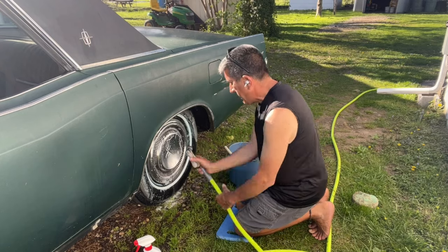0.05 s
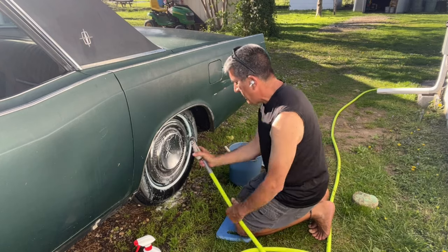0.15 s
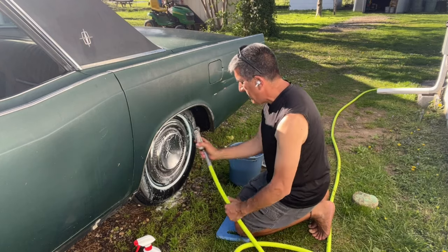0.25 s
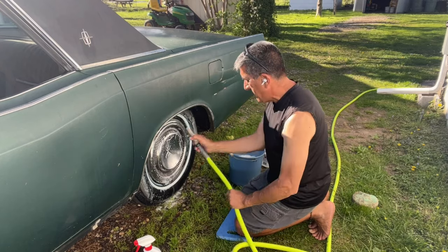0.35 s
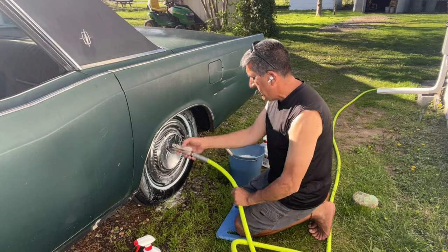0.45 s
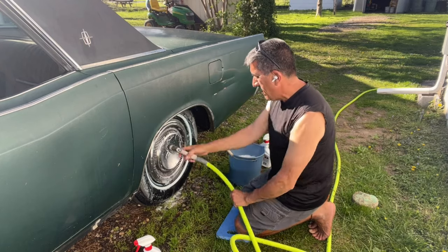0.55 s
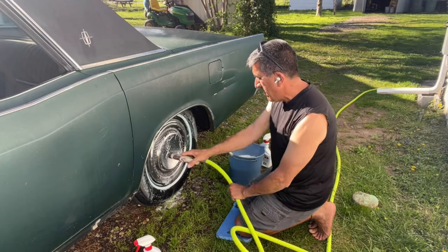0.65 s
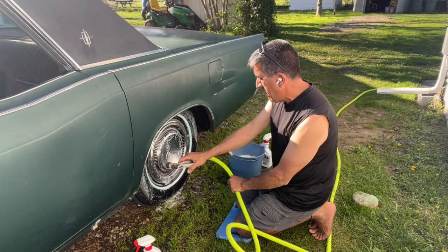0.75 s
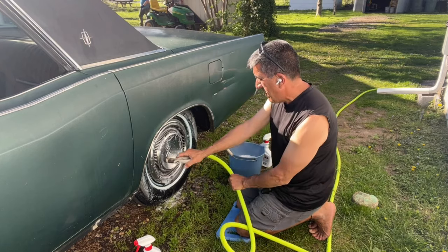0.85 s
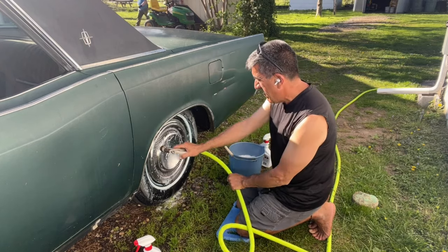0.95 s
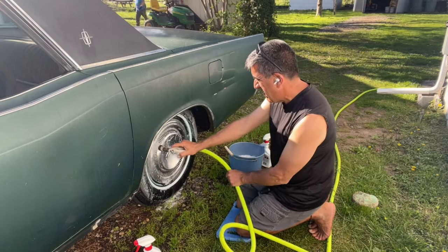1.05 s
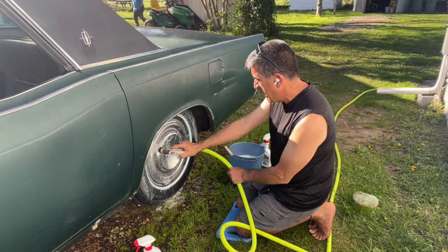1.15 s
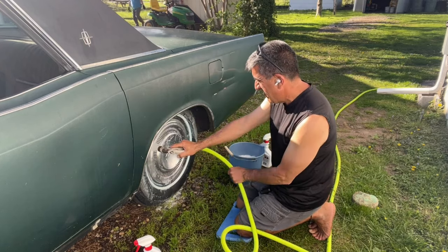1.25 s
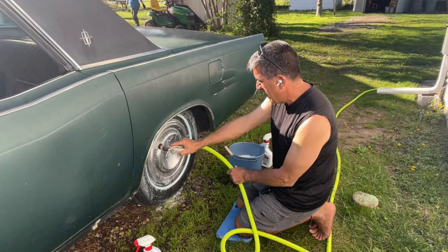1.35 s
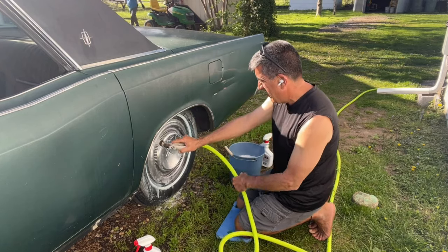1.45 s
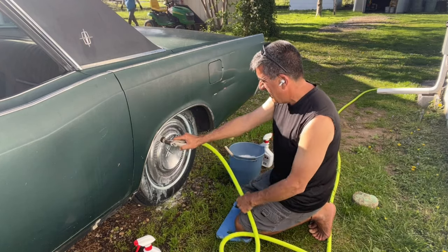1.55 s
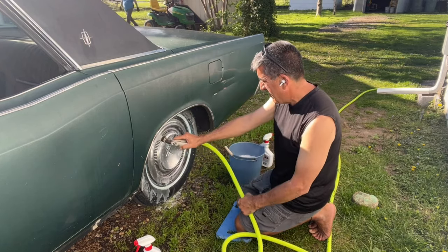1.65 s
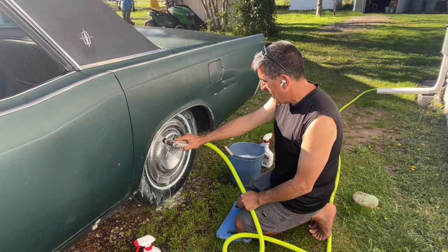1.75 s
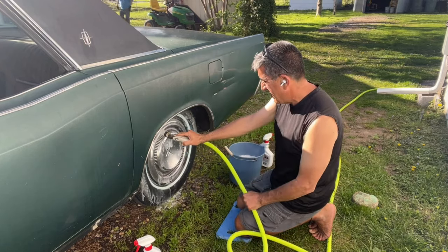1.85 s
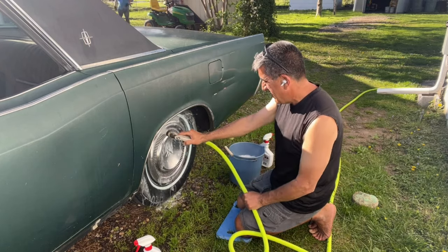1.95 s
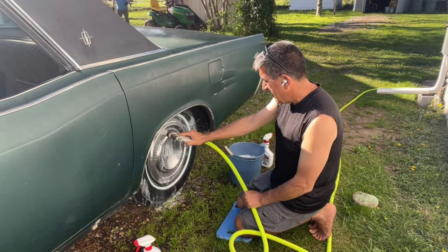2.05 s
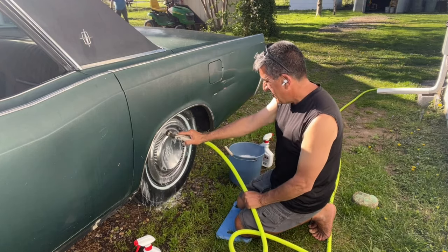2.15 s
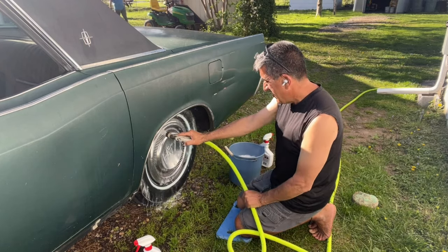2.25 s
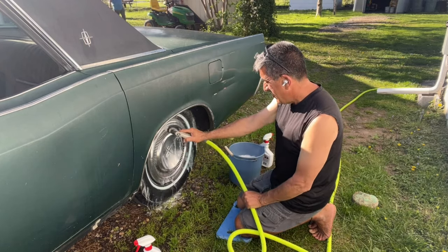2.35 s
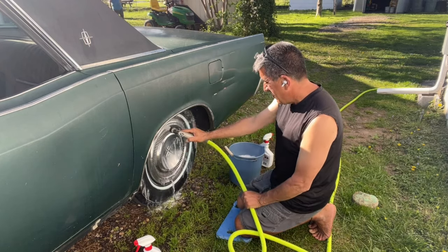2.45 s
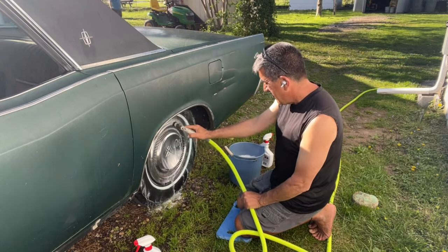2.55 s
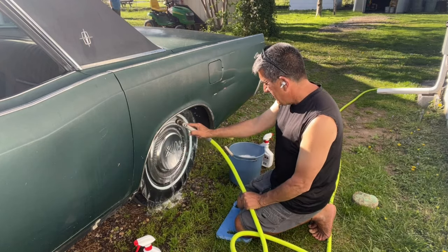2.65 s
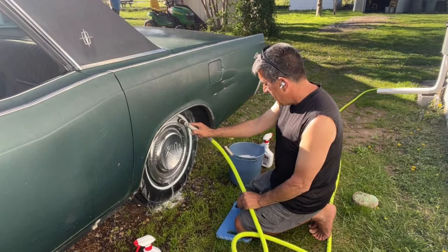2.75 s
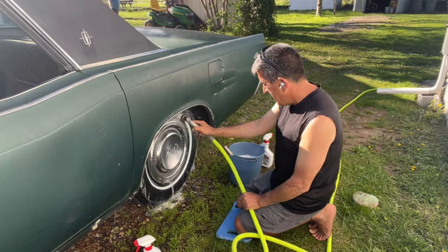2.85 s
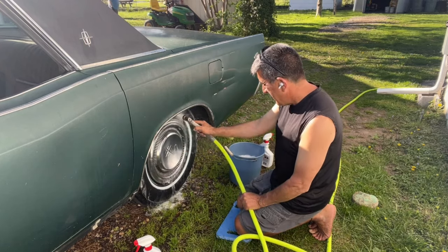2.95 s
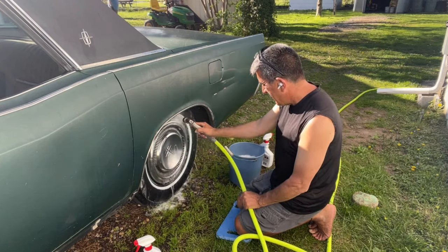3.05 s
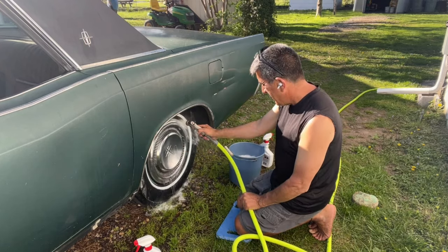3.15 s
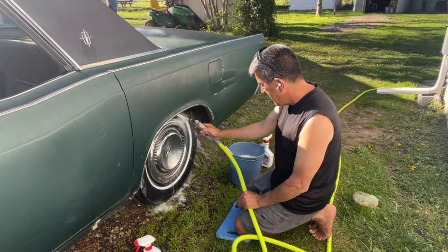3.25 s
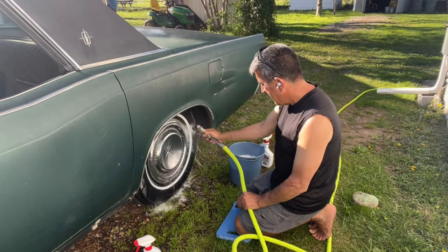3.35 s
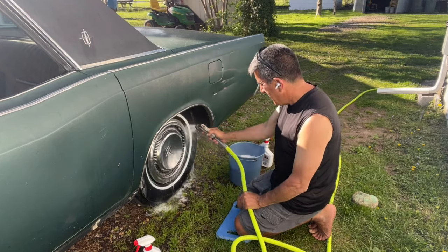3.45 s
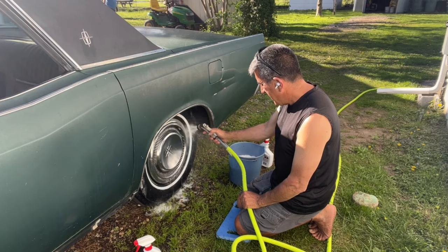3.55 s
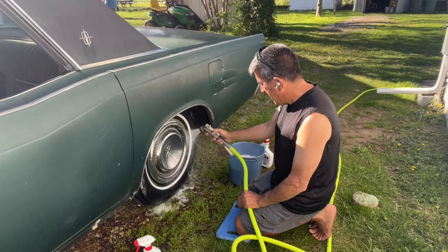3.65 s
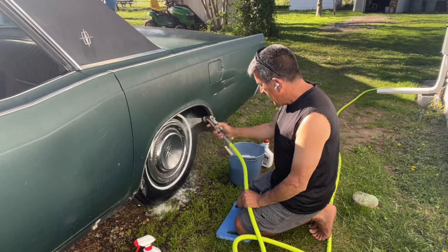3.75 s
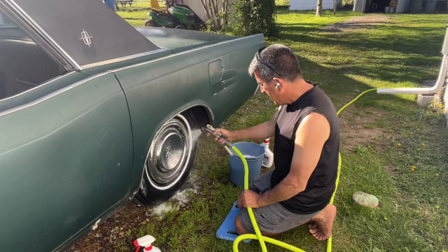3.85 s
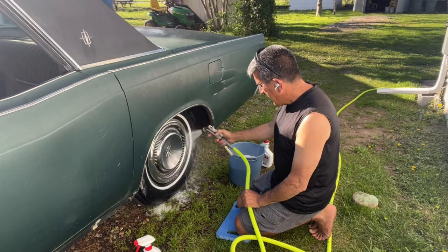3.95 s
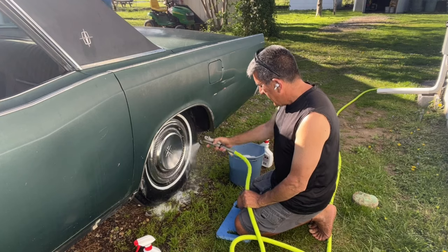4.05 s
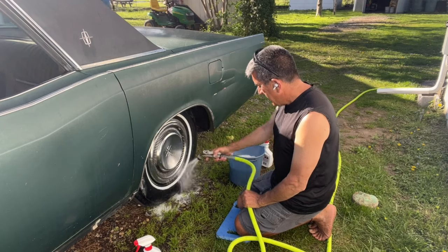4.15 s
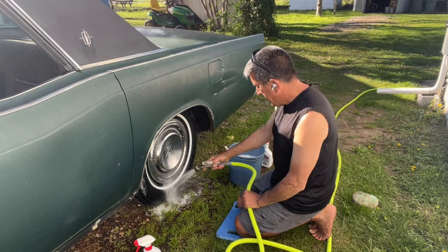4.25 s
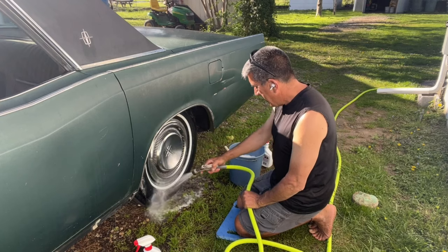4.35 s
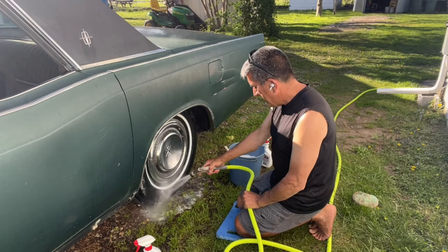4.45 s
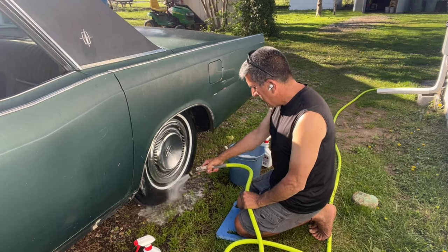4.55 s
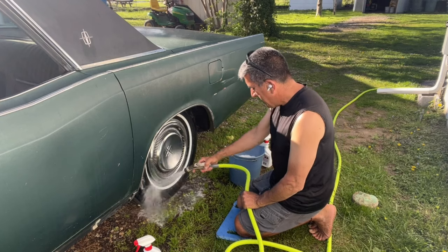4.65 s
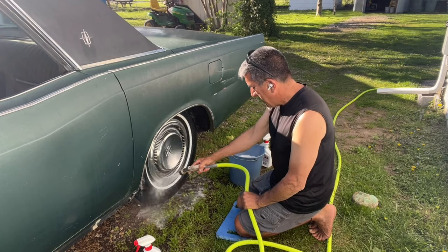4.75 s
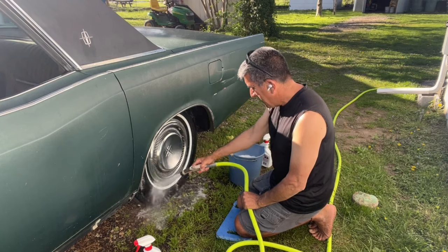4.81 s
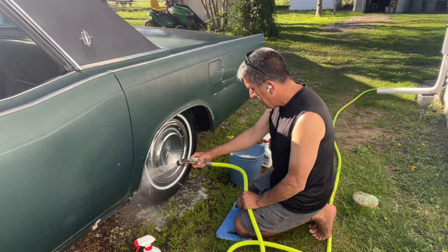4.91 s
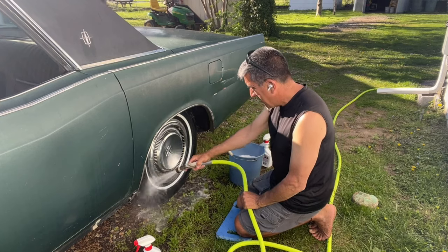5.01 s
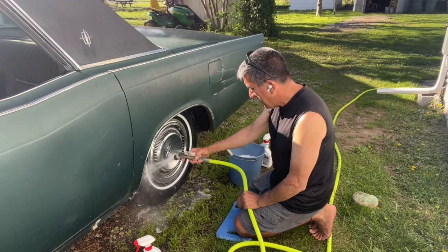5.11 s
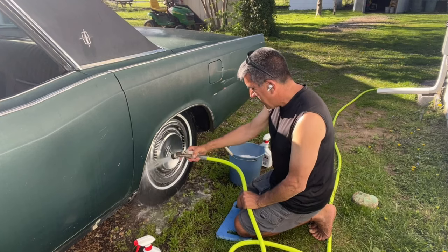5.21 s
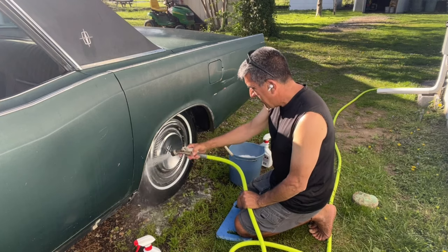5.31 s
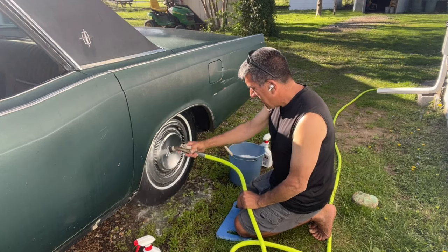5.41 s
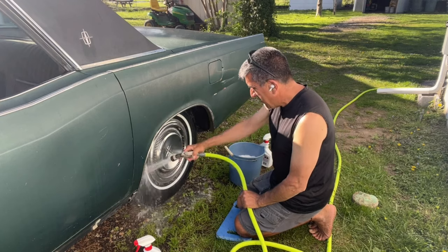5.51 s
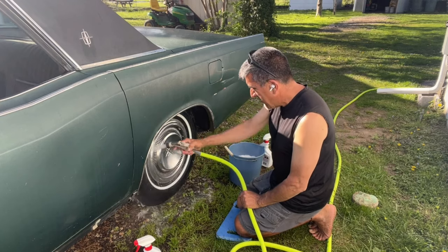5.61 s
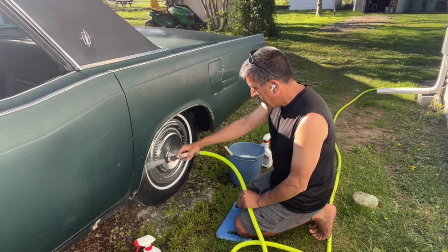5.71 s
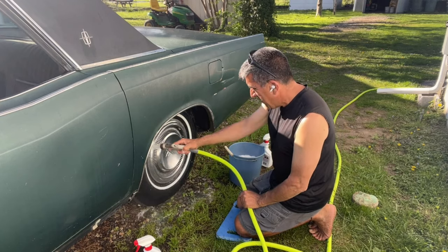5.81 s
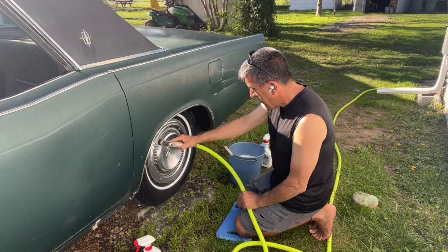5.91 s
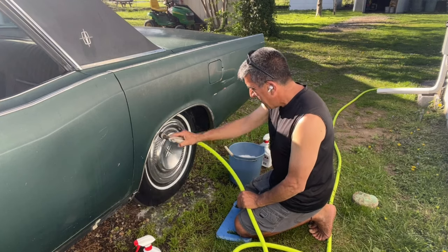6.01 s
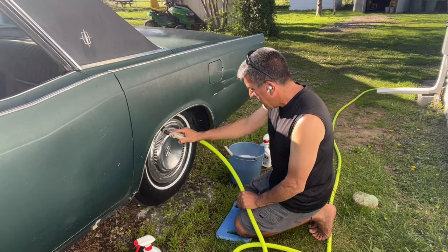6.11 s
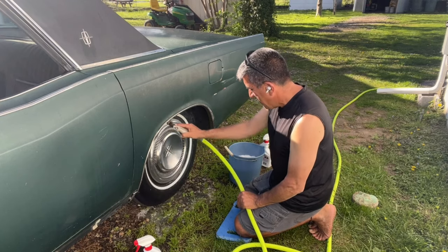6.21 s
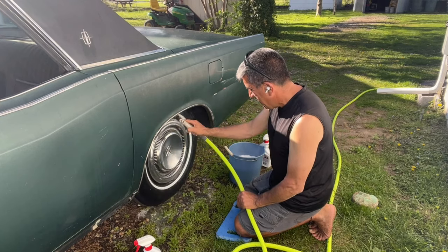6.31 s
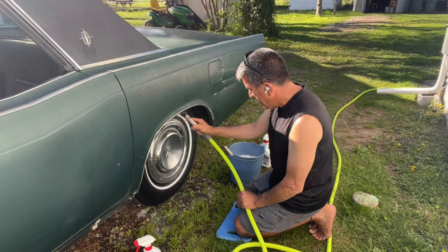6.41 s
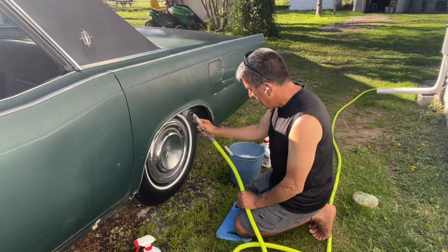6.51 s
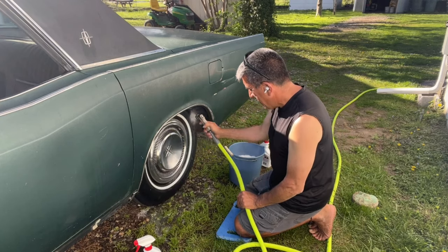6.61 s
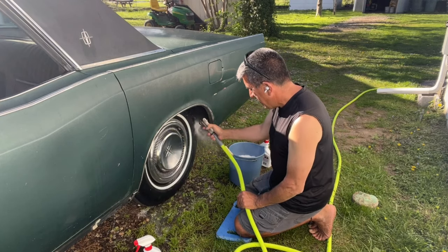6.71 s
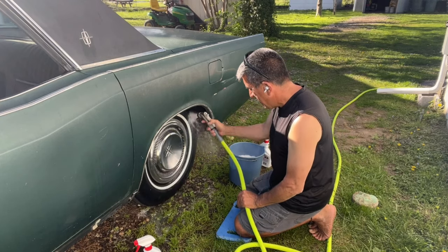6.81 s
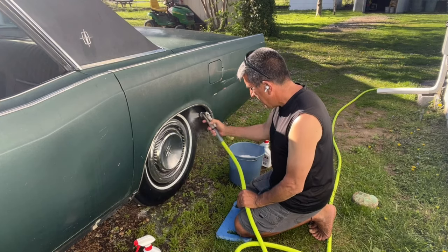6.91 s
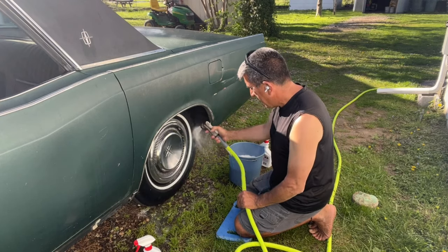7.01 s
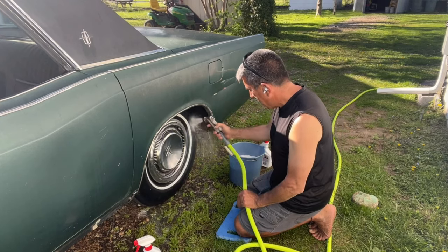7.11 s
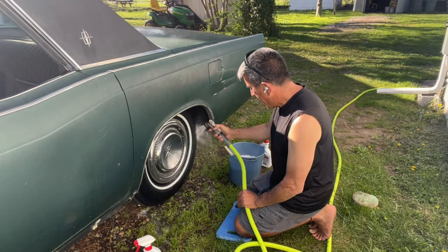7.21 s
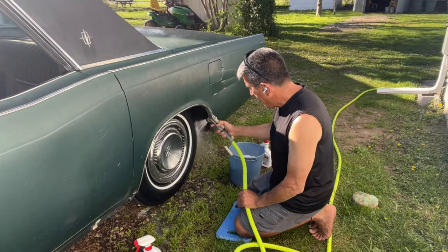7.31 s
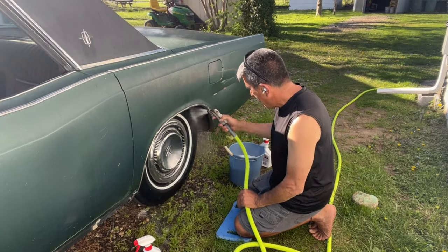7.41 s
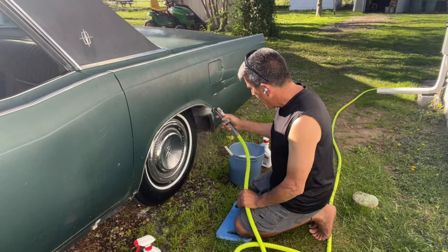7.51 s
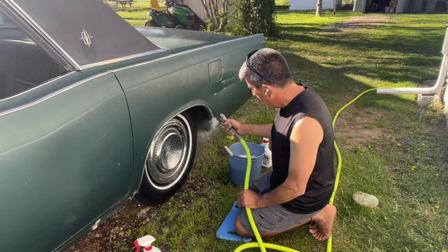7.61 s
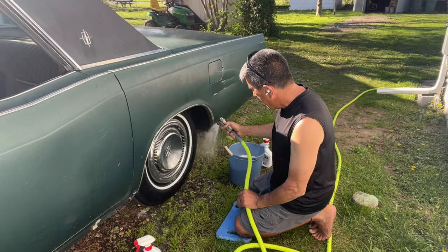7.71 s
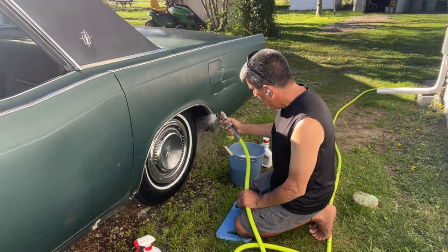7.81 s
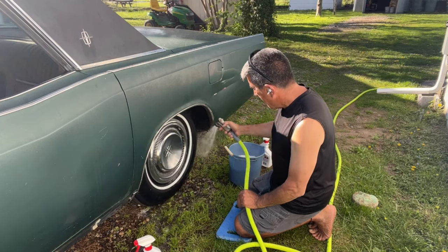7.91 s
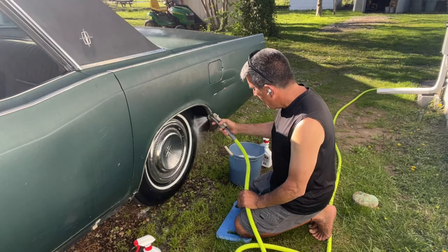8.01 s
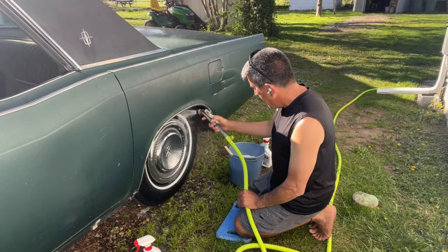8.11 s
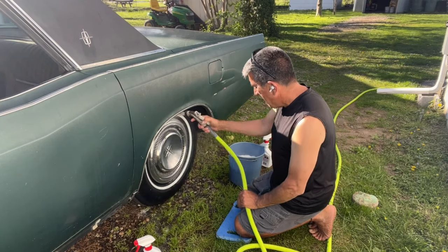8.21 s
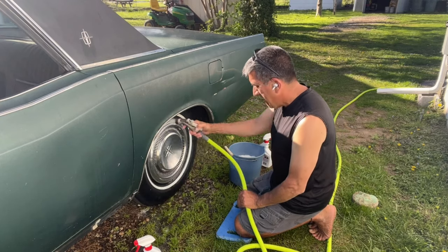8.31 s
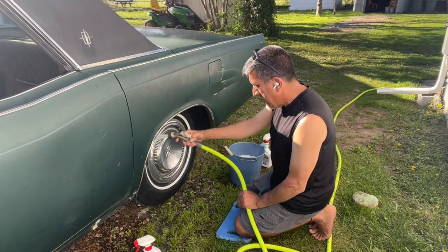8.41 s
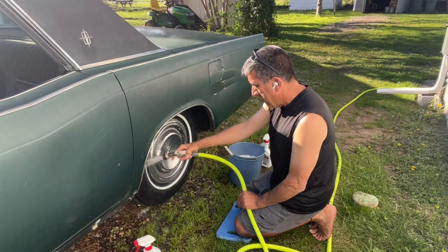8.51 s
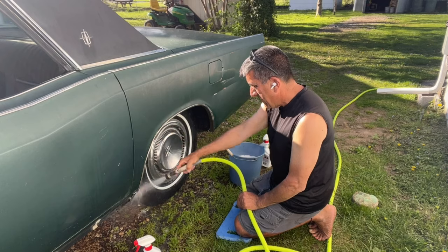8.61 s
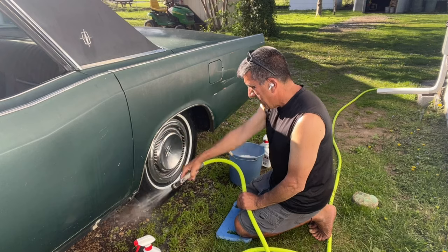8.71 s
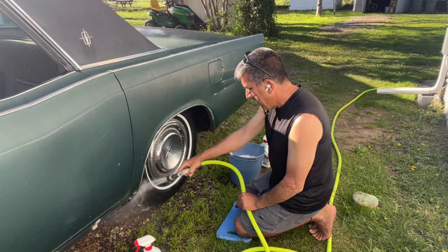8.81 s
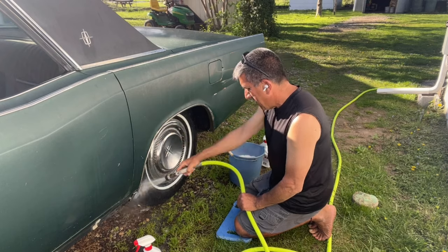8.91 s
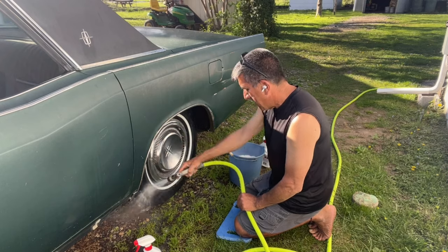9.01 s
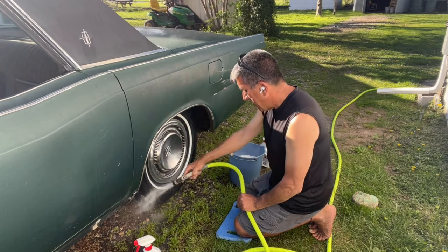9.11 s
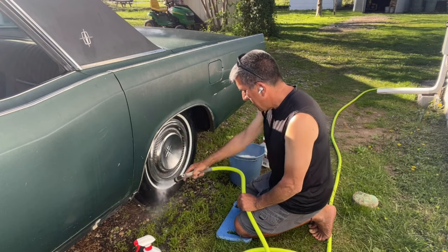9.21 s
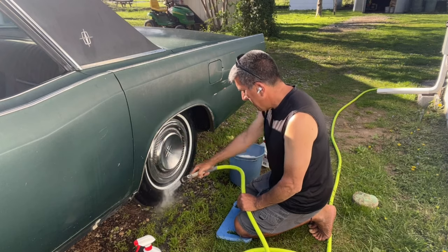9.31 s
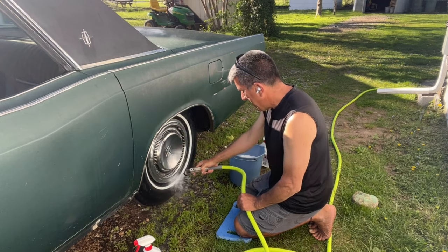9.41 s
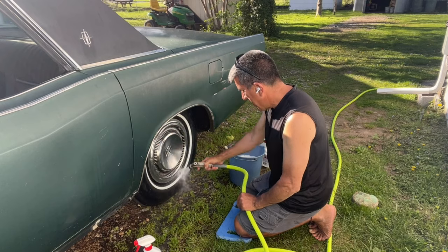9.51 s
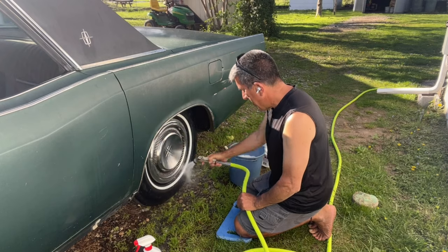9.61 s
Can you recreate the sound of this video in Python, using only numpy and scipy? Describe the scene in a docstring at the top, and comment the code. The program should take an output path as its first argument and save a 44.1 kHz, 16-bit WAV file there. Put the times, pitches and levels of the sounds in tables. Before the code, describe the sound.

After a quiet second outdoors with faint rustles, a hose nozzle opens and sprays hissing water over a car wheel, surging and dipping as it sweeps.

```python
"""Garden hose on a car wheel

A garden hose rinses a car's tire and hubcap on a lawn, heard by one microphone.
The nozzle opens after one second: showers of random drops, filtered into impacts, mist, sizzle, splash and
drumming, surge as the jet sweeps the wheel. Noise through narrow resonances makes hollow notes swell.
Shaped noise makes the rustles, bumps and soft outdoor wash behind; a wind filter soon cuts its bass."""
import sys
import numpy as np
from scipy import signal
from scipy.fft import rfft, irfft
from scipy.io import wavfile

SR = 44100
rng = np.random.default_rng(int(sys.argv[2]) if len(sys.argv) > 2 else 0)


def transcribe(u):
    """Save the signal u as a 16-bit wav file named by the first command-line argument.

    u: samples, shape (n,) or (channels, n), limited to [-1, 1]; the rate is SR.
    q: integer samples, one column per channel.
    """
    v = np.clip(np.atleast_2d(u).T, -1, 1)
    q = np.round(v * 32767).astype(np.int16)
    wavfile.write(sys.argv[1], SR, q)


N = 426006
T, HZ = np.arange(N) / SR, np.fft.rfftfreq(N, 1 / SR)  # time in s, frequency in Hz

# Spectra of the showers, from hard impacts to the ringing hubcap: (frequency [Hz], relative density [dB])
IMPACT_SPECTRUM = [(2500, -36), (3500, -15), (3950, -4.5), (4230, -1.5), (4700, -0.5), (5200, -2),
                   (5700, -12.5), (6450, -8.5), (7300, -19), (12000, -44)]
MIST_SPECTRUM = [(2500, -33.5), (4500, -9.5), (6000, -2), (7200, -1.5), (8600, 0.5), (10100, 0),
                 (10500, -2.5), (10900, -4), (11450, -11.5), (12000, -44.5)]
SIZZLE_SPECTRUM = [(4800, -31), (5700, -2.5), (6400, -1.5), (7000, -6.5), (8500, -30.5)]
SPLASH_SPECTRUM = [(900, -29.5), (1650, -12.5), (1800, -7.5), (2100, -1.5), (2600, 0), (3200, 4),
                   (3650, 4.5), (4400, -7), (6400, -9.5), (9000, -30.5)]
DRUM_SPECTRUM = [(100, -25.5), (400, -9), (620, -1), (850, -2.5), (1050, -2.5), (1350, -8), (2100, -17),
                 (3000, -28.5)]
HUBCAP_SPECTRUM = [(600, -33), (900, 0), (1100, -4), (1450, -0.5), (1750, -1.5), (2100, -9.5), (3000, -29)]
# Resonances and hollows of the wheel and its well: (frequency [Hz], width [Hz], gain [dB])
WHEEL_MODES = [(708, 78, 6), (819, 25, 9), (1146, 26, 8), (1497, 120, 7.5), (1540, 60, -3), (1815, 43, 7.5),
               (1923, 110, 5.5), (2310, 110, 2), (2927, 73, 5.5), (3023, 130, -6), (3117, 65, 4)]
# Slow drift of the spray between passes, before each shower's own trim:
# (time [s], impact level [dB], mist level [dB], splash level [dB])
SPRAY_DRIFT = [(1.1, -42.3, -44.5, -52), (1.57, -44, -45.5, -52), (1.78, -46.5, -46, -55.5),
               (2.3, -47, -44, -58.5), (2.8, -46.5, -46, -56.5), (3.0, -48.5, -48, -60),
               (3.45, -46.5, -48.5, -56.5), (3.98, -49.5, -50.5, -60), (4.5, -47.5, -48, -58.5),
               (5.25, -47.5, -48, -58), (5.75, -48, -46.5, -61), (6.1, -45.5, -47, -62),
               (6.6, -50.5, -52, -64.5), (7.2, -49.5, -49, -63.5), (7.8, -51, -54, -63.5),
               (8.25, -48, -46.5, -56.5), (8.7, -49.5, -50.5, -64), (9.64, -44.5, -45.5, -55)]
# The jet passes squarely over the wheel:
# (time [s], duration [s], surge [dB], extra drumming on hollow metal [dB], extra mist [dB])
WHEEL_PASSES = [(1.141, 0.096, 1, 6.5, 2), (1.953, 0.14, 5, 0.5, 1), (2.057, 0.095, 3, 3, 1),
                (2.472, 0.15, 4.5, 2, 1), (3.133, .08, 6, 0.5, 3), (3.221, 0.092, 7, -0.5, 1),
                (3.333, 0.13, 5.5, -0.5, 1.5), (3.66, 0.085, 3, -4.5, 1), (3.818, 0.073, 3.5, 1, 1.5),
                (4.087, 0.093, 5, 2, 1.5), (4.166, 0.095, 5.5, -1.5, 1), (4.289, 0.13, 7, 1, 2.5),
                (4.394, 0.055, 3.5, -1, 2.5), (4.583, 0.13, 6, -5, 2), (4.76, 0.084, 2.5, -1.5, 2.5),
                (4.837, 0.086, 4.5, 2.5, 2), (4.936, 0.036, 3.5, -2, 1.5), (5.045, 0.11, 5.5, -3, 4.5),
                (5.233, 0.14, 2.9, -0.5, 4.5), (5.473, 0.15, 5.5, -2, 3.5), (5.937, .12, 1.2, 1.5, 0),
                (6.97, 0.11, 2.3, 1, 0.7), (7.91, .06, 1, 3.5, 2.5), (8.282, 0.082, 5, -3, -0.5),
                (8.356, 0.061, 1, 2, 0), (8.938, 0.045, 2.5, -0.5, 2), (9.488, 0.061, 4.5, 5.5, 0.5)]
# The jet slips past the tire into the wheel well and the spray dips: (time [s], duration [s], dip [dB])
WELL_SLIPS = [(6.846, 0.077, -4), (7.112, .07, -4.5), (7.36, 0.083, -6.5), (7.567, 0.072, -4),
              (7.778, 0.086, -6.5), (8.01, 0.24, -5.5), (8.478, .08, -4.5)]
# Where the nozzle points: (time [s], height on the wheel [0 at the ground to 1 at the top of the rim])
NOZZLE_HEIGHT = [(1.0, 0.18), (1.7, 0.74), (2.2, 0.5), (2.8, 0.57), (3.4, 0.99), (4.0, 1), (4.5, 0),
                 (5.2, 0.027), (6.1, 0.94), (7.0, 1), (7.8, 0.64), (8.4, 0.73), (9.1, 0.17), (9.6, 0.23)]
# The jet dwells on a spot and one hollow note swells:
# (time [s], duration at half power [s], frequency [Hz], level [dB])
HOLLOW_NOTES = [(1.133, 0.055, 1870, -53), (1.21, 0.12, 978, -53.5), (1.304, 0.39, 732, -66.5),
                (1.494, .5, 830, -64), (2.073, 0.082, 1120, -60), (2.016, 0.09, 1484, -56.5),
                (3.187, 0.056, 1500, -57), (3.308, 0.11, 1480, -55), (4.165, 0.076, 1480, -58.5),
                (4.43, 0.27, 704, -65.5), (5.8, 0.33, 1906, -65), (9.002, 0.13, 702, -67.5),
                (9.503, 0.12, 1460, -61)]
# The band that the wheel well's echo cancels: (time [s], centre [Hz], depth [0-1])
WELL_HOLLOW = [(1.2, 1180, .92), (1.75, 1047, 0.67), (3.4, 1004, 1), (4.5, 930, .72), (5.3, 898, .3),
               (9.6, 907, 0.3)]
# Soft low bumps and rumbles: (time [s], duration at half power [s], level [dB])
BUMP_EVENTS = [(1.16, .02, -68), (1.635, .025, -67), (2.116, 0.056, -72), (4.02, .02, -74),
               (4.485, .02, -67), (7.228, .018, -60), (7.8, 0.41, -69), (8.35, .2, -77)]
# Their dull tone: (frequency [Hz], relative density [dB])
BUMP_SPECTRUM = [(30, -20), (80, -1), (130, 3), (220, -3), (400, -24)]
# Soft rustles of the hose and clothes as the arm lifts: (time [s], duration at half power [s], level [dB])
RUSTLE_EVENTS = [(0.05, 0.078, -76), (0.107, 0.044, -69), (0.21, 0.086, -64.5), (0.458, .012, -70)]
# Their bright tone: (frequency [Hz], relative density [dB])
RUSTLE_SPECTRUM = [(3000, -19), (5000, -3), (6500, -3), (10000, -1), (11200, -13), (12000, -30)]
# The outdoor wash: (frequency [Hz], relative density [dB])
YARD_SPECTRUM = [(25, -43), (55, -19), (110, -8), (310, -13.5), (560, -4), (720, -5), (1020, -5),
                 (1400, -5), (1900, -1.5), (2200, -2.5), (3200, 1), (4100, -5), (5500, -17.5),
                 (10000, -24.5), (12000, -41)]
# Bumps and hollows in the wash: (frequency [Hz], width [Hz], gain [dB])
YARD_RIPPLE = [(1590, 160, -5.5), (1780, 31, 6.5)]
# Ripple of the microphone port: (frequency [Hz], width [Hz], gain [dB])
PORT_RIPPLE = [(4220, 150, 4), (4610, 87, 3.5), (5405, 110, -9), (5600, 62, 2.5), (5910, 220, -2.5),
               (5870, 90, 3.5), (6050, 77, -2.5), (7300, 54, -4.5), (7660, 190, -2), (7850, 64, 1.5),
               (8100, 110, 1.5), (8800, 230, 0.7), (9550, 180, -1.7), (9950, 230, 2), (10150, 98, -5),
               (10900, 90, 1.5)]
# The wind filter's bass cut: (frequency [Hz], gain [dB])
WIND_FILTER = [(30, -18.5), (100, -25.5), (250, -29.5), (450, -25), (570, -19), (630, -8.5), (680, 0.5)]

OPEN_S, OPEN_TIME = 1, 0.098  # the valve starts to open, and takes this long (s, s)
LAND_S, LAND_TIME = 1.075, 0.02  # the full jet starts to land, and takes this long (s, s)
PASS_EDGE = 3.6  # how squarely a pass starts and ends (2 is a plain bell)
SPLASH_SURGE, DRUM_SURGE, HUBCAP_SURGE = 1.0, .25, .65  # share of a surge; the impacts take all of it
SPLASH_HOLLOW = 0.72  # share of the extra drumming that reaches the splash
IMPACT_SLIP, SPLASH_SLIP, DRUM_SLIP = 0.38, 1, 0.63  # share of a dip; the mist takes all of it
# the low showers follow the splash drift: dB per dB, and offset in dB
DRUM_FOLLOW, DRUM_DB = 0.51, -35
HUBCAP_FOLLOW, HUBCAP_DB = .75, -19
# the hubcap rings less after the first round of the wheel: start (s), fade (s), change (dB)
HUBCAP_DULLS_S, HUBCAP_DULL_TIME, HUBCAP_DULL_DB = 3.7, 0.74, -5
RIM_DB, RIM_RISE_DB = -21, 14.5  # sizzle against the impacts: at the ground, and its gain at the top
NOTE_WIDTH_HZ = 76  # bandwidth of the first of the two resonators that make a note; the second is twice as wide
YARD_DB = -60.5
WIND_CUT_S = 0.82  # middle of the wind filter's switch-in
EDGE_HZ = 11900  # top of the microphone's band


def spray():
    """Showers of drops strike the wheel, follow the sweep and share the sputter of the jet as it breaks up."""
    impact_db, mist_db, splash_db, drum_db, hubcap_db = sweep()
    height = curves(NOZZLE_HEIGHT)[0]
    sizzle_db = impact_db + RIM_DB + RIM_RISE_DB * height
    sputter = flutter(5.7, 70)
    wheel_db = ripple(WHEEL_MODES)

    def shower(clicks, colour_db, level_db, sputter_db, patchy_db):
        """One shower, coloured by what it strikes; a negative sputter wavers against the others."""
        uneven = gain_of(sputter_db * sputter + patchy_db * flutter(2.5, 46))
        return gain_of(level_db) * evened(coloured(clicks * uneven, colour_db))

    impact = shower(drops(4000, 3.0, 1.2), read(IMPACT_SPECTRUM), impact_db - .13,
                    sputter_db=0.34, patchy_db=0.67)
    sizzle = shower(drops(5500, 2.0, 1.1), read(SIZZLE_SPECTRUM), sizzle_db,
                    sputter_db=-1.8, patchy_db=4.0)
    mist = shower(drops(5000, 4.0, 1.4), read(MIST_SPECTRUM), mist_db + 0.75,
                  sputter_db=0.57, patchy_db=0.61)
    splash = shower(drops(3000, 3.1, 1.1), read(SPLASH_SPECTRUM) + wheel_db, splash_db + 2.0,
                    sputter_db=0.6, patchy_db=0.87)
    drum = shower(drops(1200, 2.5, .9), read(DRUM_SPECTRUM) + wheel_db, drum_db,
                  sputter_db=-0.5, patchy_db=1.2)
    hubcap = shower(drops(1500, 3.1, 0.76), read(HUBCAP_SPECTRUM) + wheel_db, hubcap_db,
                    sputter_db=-0.8, patchy_db=1.8)
    valve = ramp(OPEN_S, OPEN_TIME)
    landed = ramp(LAND_S, LAND_TIME)
    return valve * mist + valve ** 2 * (impact + sizzle) + landed * (splash + drum + hubcap)


def sweep():
    """Levels in dB of the showers: a slow drift, a surge at each pass over the wheel, a dip at each slip."""
    impact, mist, splash = curves(SPRAY_DRIFT)
    on_wheel = np.array([2 ** -np.minimum(abs(2 * (T - s) / duration), 10) ** PASS_EDGE
                         for s, duration, *_ in WHEEL_PASSES])
    surge, hollow, misty = np.transpose(WHEEL_PASSES)[2:] @ on_wheel
    dip = sum(db * bell(T, s, duration) for s, duration, db in WELL_SLIPS)
    low = hollow + DRUM_SLIP * dip
    dulled = HUBCAP_DULL_DB * ramp(HUBCAP_DULLS_S, HUBCAP_DULL_TIME)
    return (impact + surge + IMPACT_SLIP * dip,
            mist + misty + dip,
            splash + SPLASH_SURGE * surge + SPLASH_HOLLOW * hollow + SPLASH_SLIP * dip,
            DRUM_DB + DRUM_FOLLOW * splash + DRUM_SURGE * surge + low,
            HUBCAP_DB + HUBCAP_FOLLOW * splash + HUBCAP_SURGE * surge + low + dulled)


def wheel_notes():
    """Drops, as plain noise, drive one narrow resonance while the jet stays on its spot."""
    notes = np.zeros(N)
    r = np.exp(-np.pi * NOTE_WIDTH_HZ / SR)
    for s, duration, hz, db in HOLLOW_NOTES:
        turn = np.exp(2j * np.pi * hz / SR)
        ring = signal.lfilter([1], [1, -r * turn], rng.standard_normal(N))
        ring = signal.lfilter([1], [1, -r ** 2 * turn], ring).real
        notes += gain_of(db) * np.sqrt(bell(T, s, duration)) * evened(ring)
    return notes


def well_echo(x):
    """The wheel well's echo cancels one band, which sinks and fills in as the hand moves on."""
    hollow_hz, depth = curves(WELL_HOLLOW)
    return x - np.clip(depth, 0, 1) * resonate(x, hollow_hz, width=150)


def bumps():
    """Dull low bumps and short rumbles: low noise under brief swells."""
    return swells(BUMP_EVENTS) * evened(coloured(rng.standard_normal(N), read(BUMP_SPECTRUM)))


def rustles():
    """Brief grainy brushes before the water starts: bright clicks over noise."""
    return swells(RUSTLE_EVENTS) * evened(coloured(drops(1500, 2.4, 0.93), read(RUSTLE_SPECTRUM)))


def yard():
    """A steady, faintly wavering wash of leaves and distance, from filtered noise."""
    colour_db = read(YARD_SPECTRUM) + ripple(YARD_RIPPLE)
    wash = evened(coloured(rng.standard_normal(N), colour_db))
    return gain_of(YARD_DB + 0.5 * flutter(3, 25)) * wash


def drops(per_s, spread_db, blur):
    """Clicks of uneven size at random moments, over the blur of countless tiny ones."""
    size_db = spread_db * np.minimum(rng.exponential(1, N), 4.5)
    size = gain_of(size_db) * rng.choice([-1, 1], N)
    clicks = size * (rng.random(N) < per_s / SR)
    return evened(clicks) + blur * rng.standard_normal(N)


def flutter(low_hz, high_hz):
    """Random wavering of rms one, rolling off gently below low_hz and above high_hz."""
    shape = HZ / (HZ + low_hz) / np.sqrt(HZ + low_hz) / (1 + (HZ / high_hz) ** 2)
    return evened(irfft(rfft(rng.standard_normal(N)) * shape, N))


def swells(events):
    """Sums smooth swells of amplitude at the listed times."""
    return sum(gain_of(db) * np.sqrt(bell(T, s, duration)) for s, duration, db in events)


def resonate(x, hz, width):
    """Shifts the curve hz down to zero, smooths, and shifts back: a moving resonance of gain one."""
    turn = np.exp(2j * np.pi * np.cumsum(hz) / SR)
    r = np.exp(-np.pi * width / SR)
    smooth = signal.lfilter([1 - r], [1, -r], x / turn + 1e-18)
    return 2 * (turn * smooth).real


def coloured(x, db):
    """Filters by a gain in dB over frequency."""
    return irfft(rfft(x) * gain_of(db), N)


def read(points):
    """A spectrum in dB, joined by straight lines over log frequency."""
    f, db = np.transpose(points)
    return np.interp(np.log(HZ + 1), np.log(f + 1), db)


def ripple(rows):
    """Resonances and notches as dB over frequency."""
    return sum(db * bell(HZ, hz, width) for hz, width, db in rows)


def curves(rows):
    """The columns of a table of time, one value per sample."""
    s, *columns = np.transpose(rows)
    return [np.interp(T, s, c) for c in columns]


def bell(x, centre, width):
    """A smooth bump of height one, width wide at half height."""
    return 2 ** -np.minimum((2 * (x - centre) / width) ** 2, 100)


def ramp(start, duration):
    """Rises from zero to one."""
    return np.clip((T - start) / duration, 0, 1)


def gain_of(db):
    """Decibels to amplitude."""
    return 10 ** (np.asarray(db) / 20)


def evened(x):
    """Scales to an rms of one."""
    return x / np.sqrt(np.mean(x ** 2) + 1e-20)


def scene():
    """Everything reaches one microphone, so both channels are alike."""
    echoed = well_echo(spray() + yard())
    mono = echoed + wheel_notes() + rustles() + bumps()
    return np.tile(mono, (2, 1))


def record(dry):
    """The port colours the treble, a wind filter switches in and takes the bass, then the band limit."""
    heard = coloured(dry, ripple(PORT_RIPPLE))
    switched = np.clip((T - WIND_CUT_S) / .01 + .5, 0, 1)  # a 10 ms crossfade
    heard = (1 - switched) * heard + switched * coloured(heard, read(WIND_FILTER))
    band_limit = signal.firwin(511, EDGE_HZ, window=("kaiser", 9), fs=SR)
    return signal.oaconvolve(heard, band_limit[None], "same")


dry = scene()
out = record(dry)
transcribe(out)
```